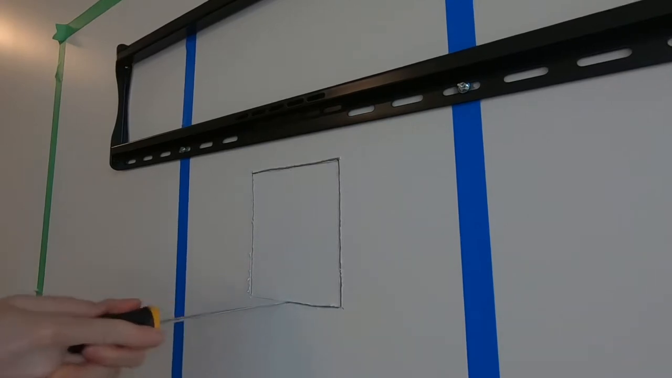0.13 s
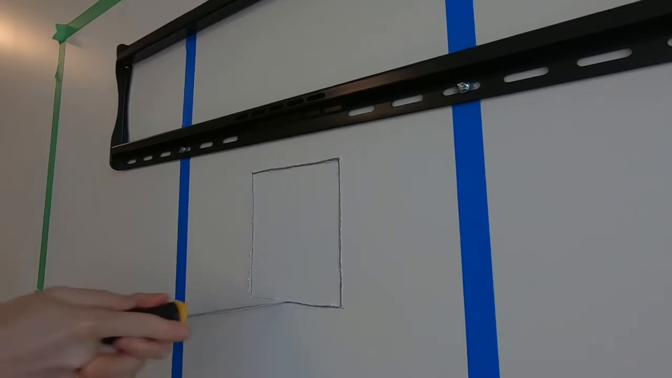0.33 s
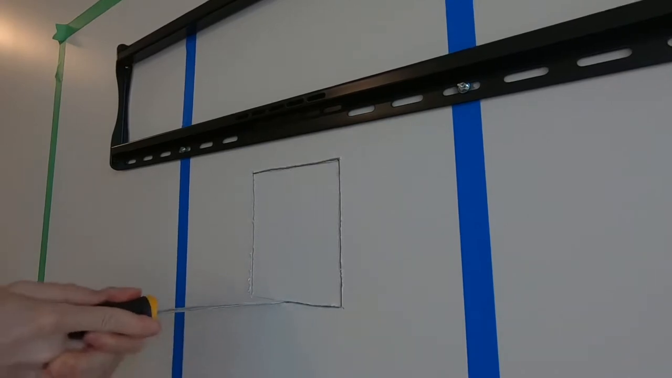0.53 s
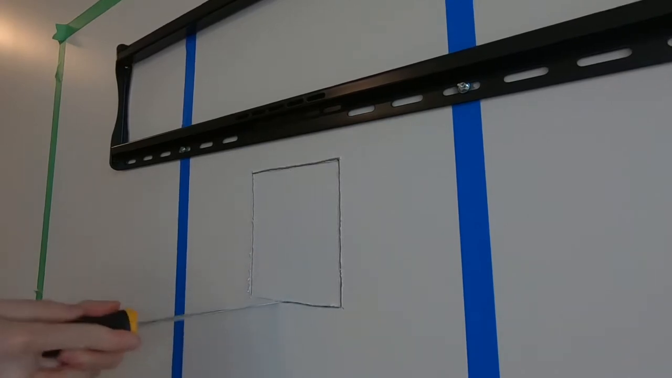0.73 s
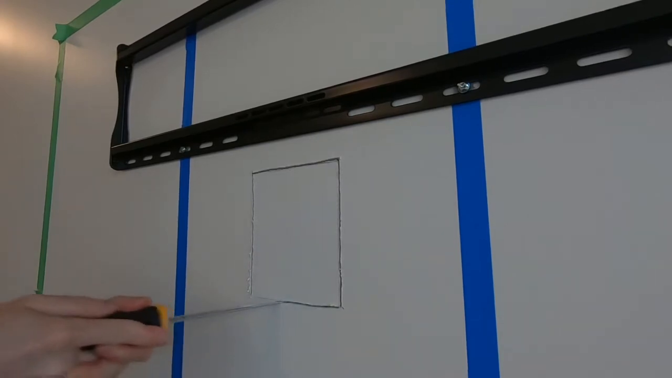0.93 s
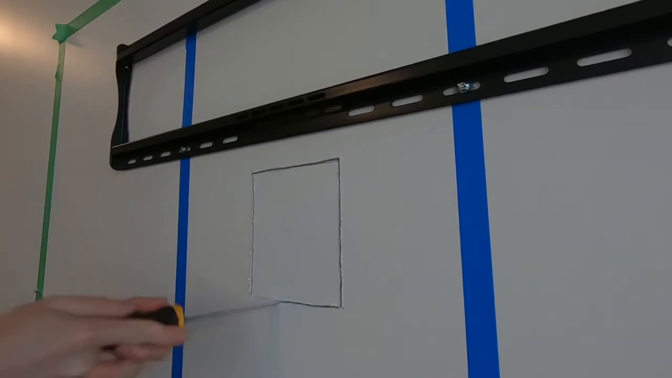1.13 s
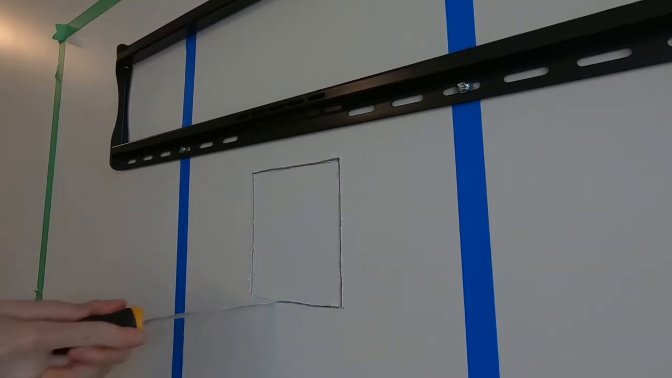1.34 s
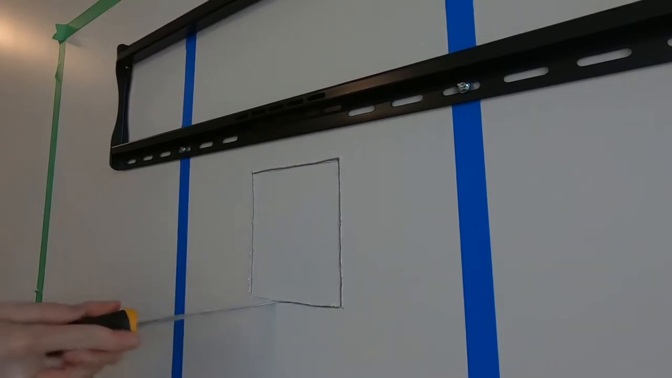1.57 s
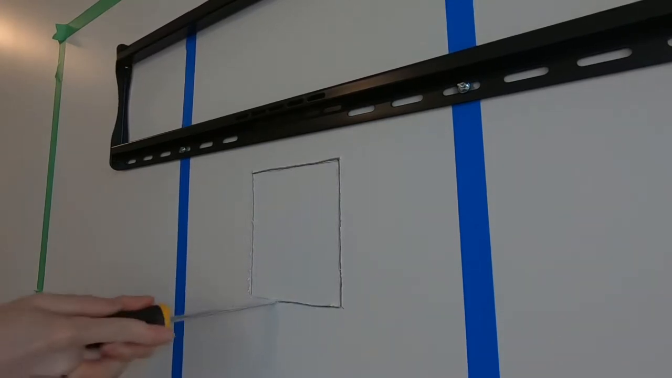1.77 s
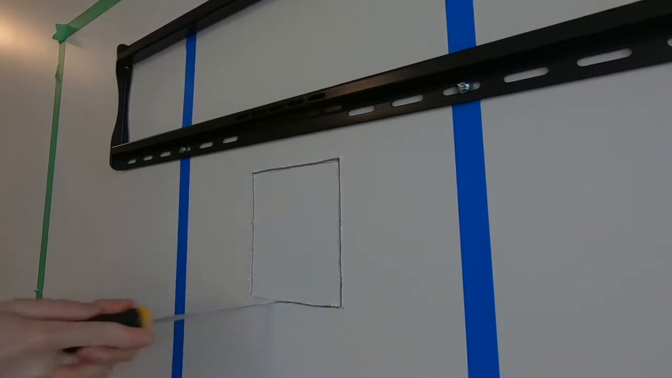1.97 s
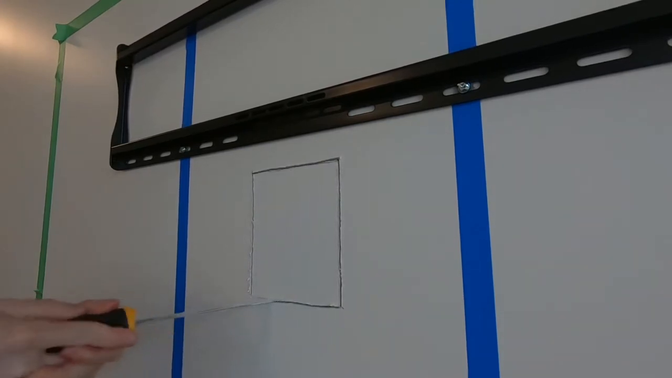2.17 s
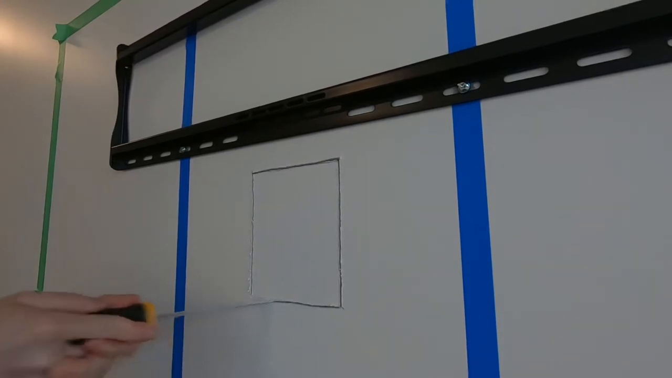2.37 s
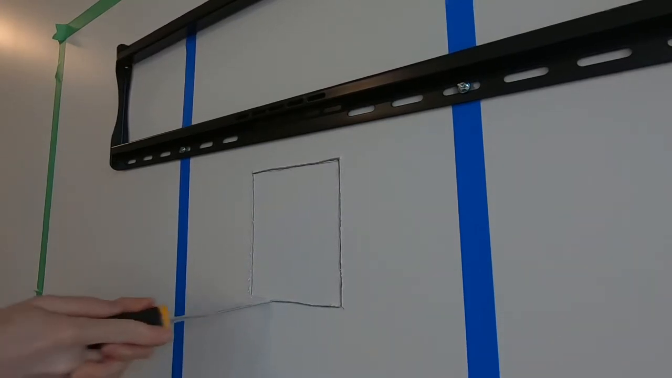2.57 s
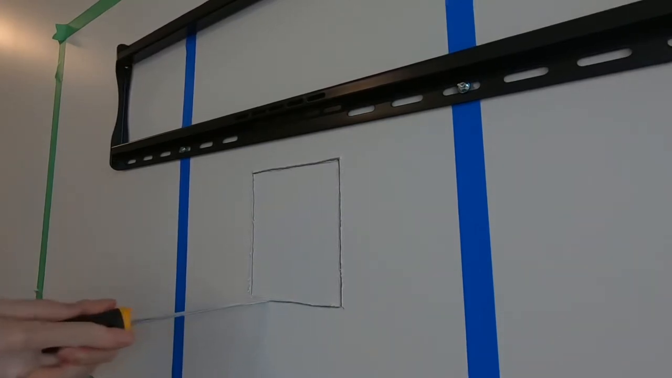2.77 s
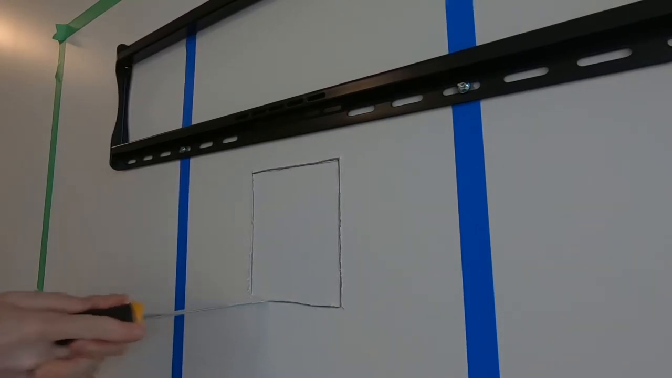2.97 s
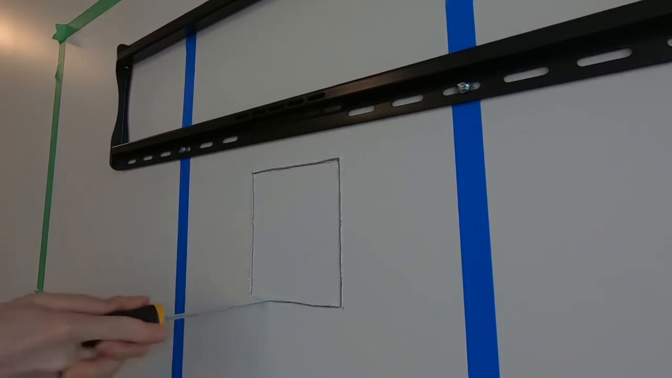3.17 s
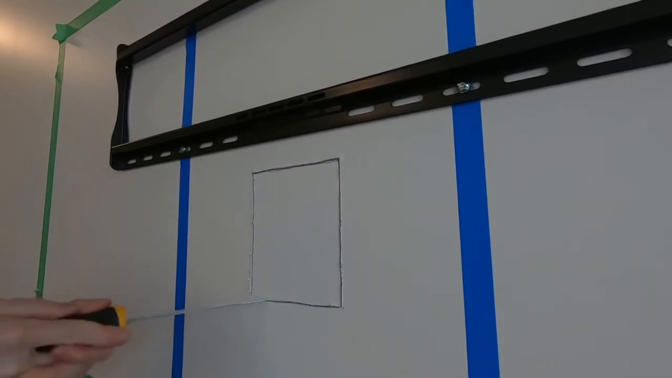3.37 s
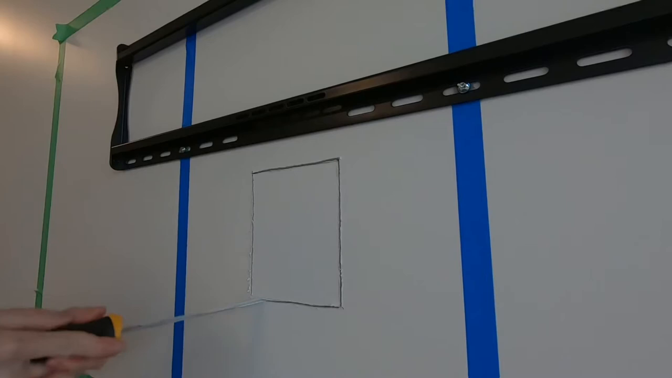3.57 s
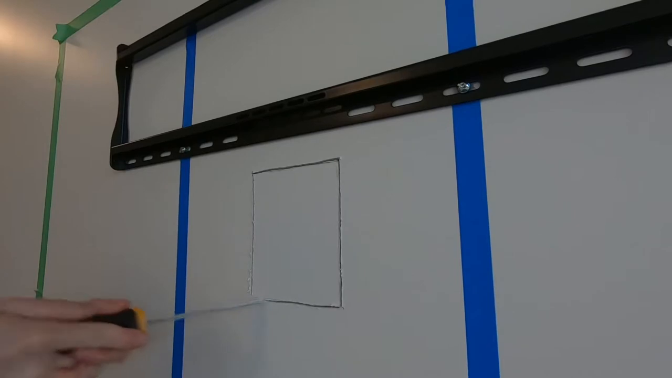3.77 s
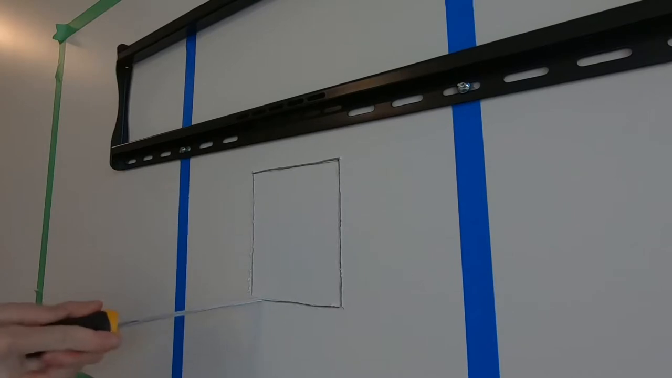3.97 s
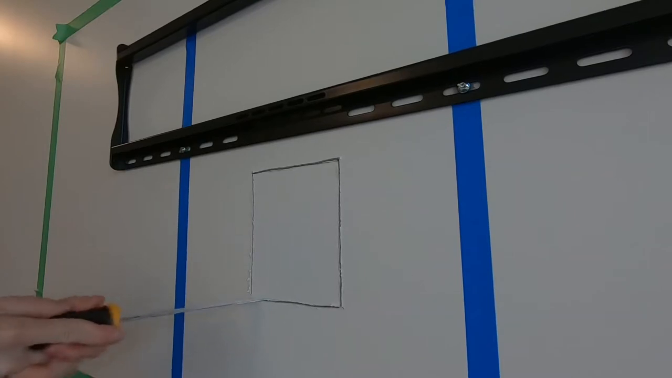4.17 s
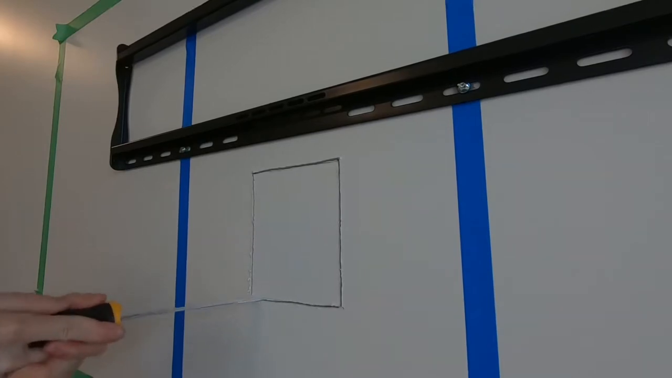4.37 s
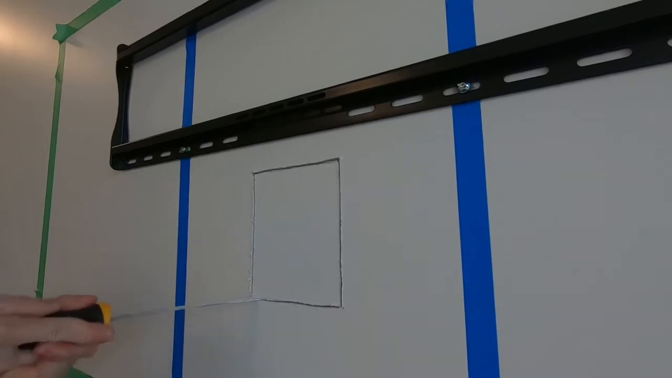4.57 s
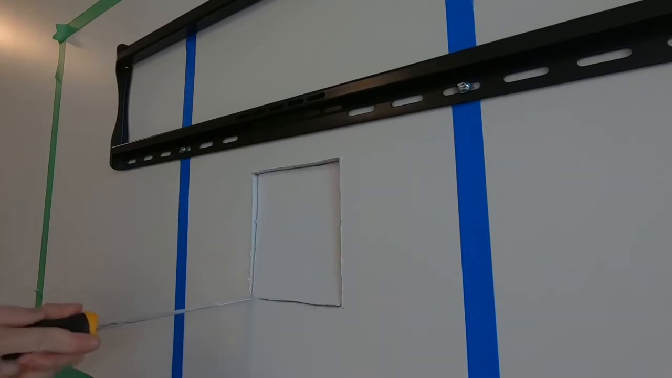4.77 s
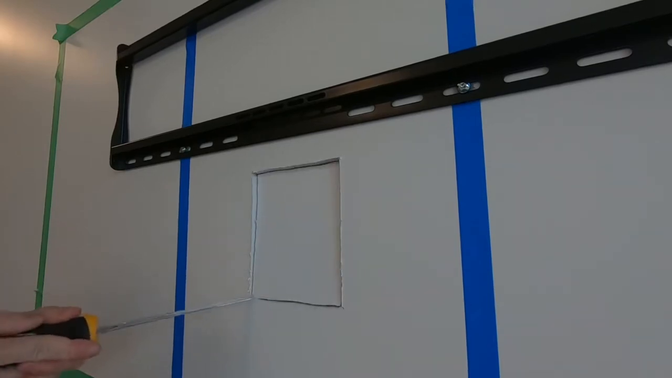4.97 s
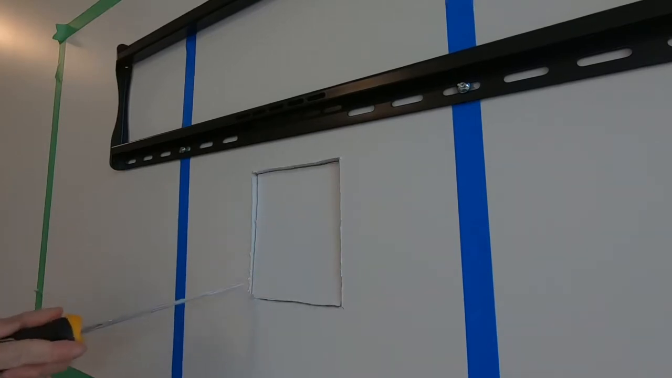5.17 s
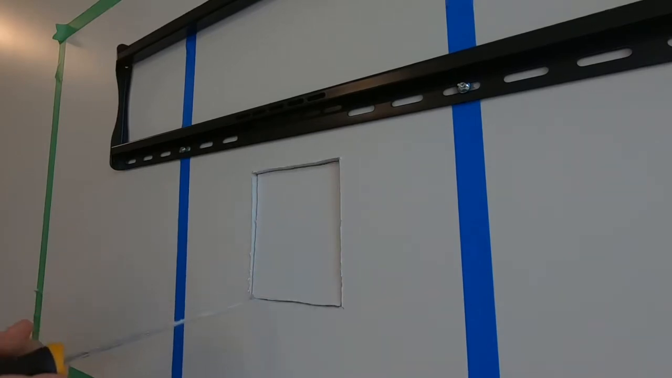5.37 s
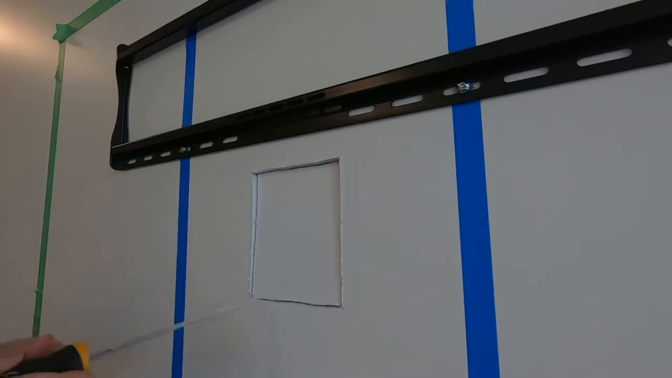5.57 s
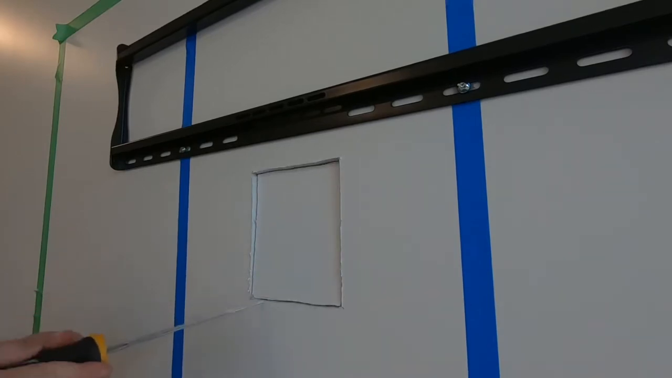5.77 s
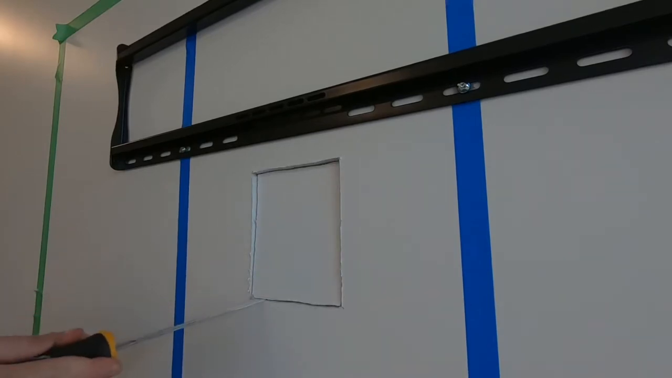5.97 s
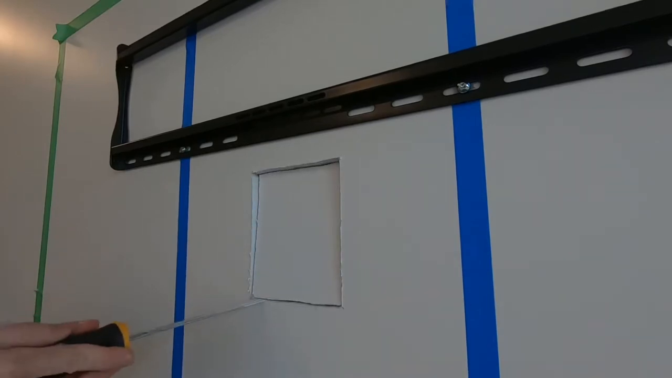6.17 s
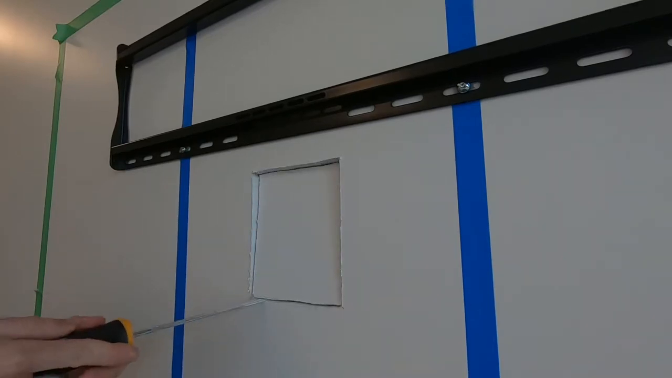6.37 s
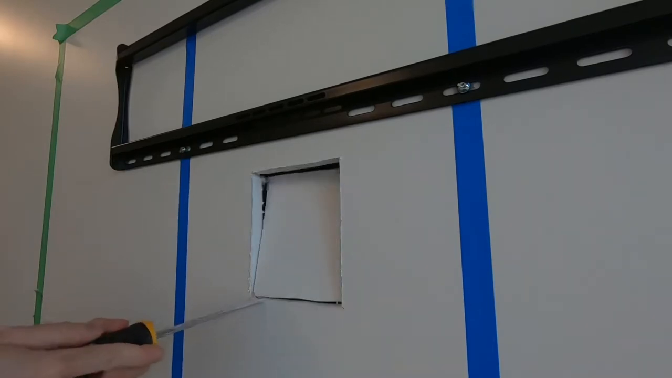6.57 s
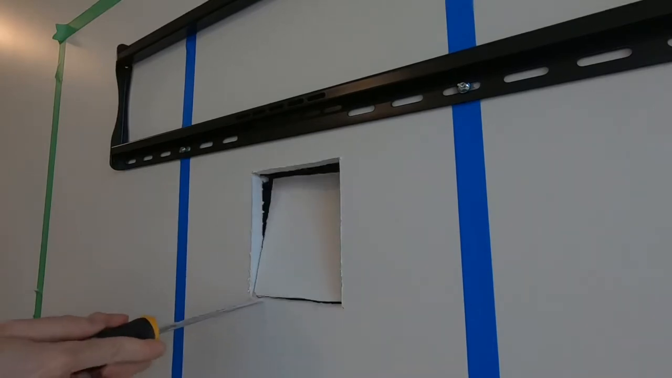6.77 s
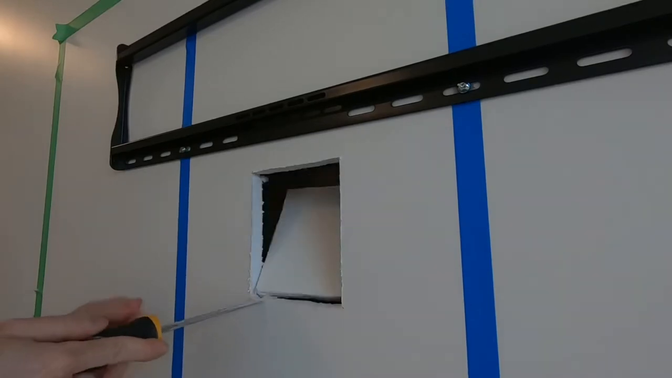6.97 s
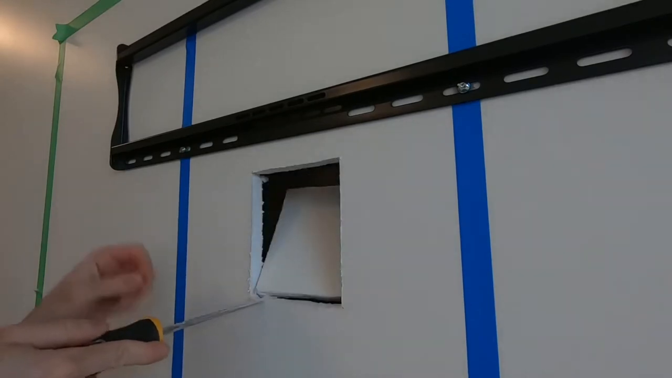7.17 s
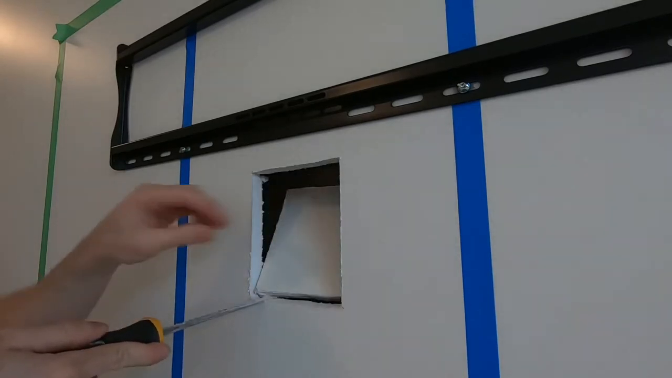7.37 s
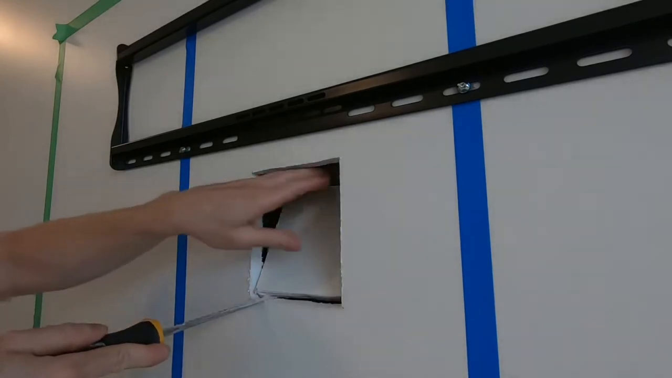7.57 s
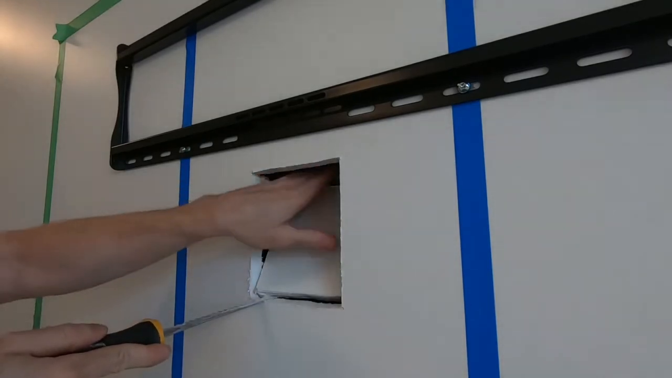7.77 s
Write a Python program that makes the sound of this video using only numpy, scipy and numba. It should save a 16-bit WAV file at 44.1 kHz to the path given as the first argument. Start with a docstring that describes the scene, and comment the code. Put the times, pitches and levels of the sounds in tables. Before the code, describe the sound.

From the start, a hand saw cuts through a plasterboard wall close by, in quick, slightly uneven back-and-forth strokes, about three or four pushes a second. Each stroke has a gritty crunch, a thin ring or squeak from the blade and a low, hollow thump from the wall. After about 4.2 seconds the strokes weaken, with small snaps, and die away by 5 seconds. A lull follows, with faint bumps and a faint low creak near 5.8 seconds. From 6 to 6.5 seconds the blade scrapes and rings briefly, loudest at the end, followed by crumbling ticks. At about 7 seconds the cut piece tips back with a quick double thud and rocks briefly. Around 7.5 seconds it gives a few light ticks under a hand. The bare room adds a short echo over faint air noise and a low hum.

```python
"""A hand saw jabs back and forth through a plasterboard wall, close by in a bare room.
Each tooth shakes the hollow wall; gypsum grit crunches and rings the blade. The cut piece then
slips, tips back with a thud and ticks under a hand. The room rings on for most of a second
over faint air noise and hum."""
import sys
import numpy as np
from scipy import signal
from scipy.fft import rfft, irfft
from scipy.io import wavfile
from scipy.ndimage import uniform_filter1d
from numba import njit

SR = 44100
rng = np.random.default_rng(int(sys.argv[2]) if len(sys.argv) > 2 else 0)


def output_pcm(signal):
    """Save a mono or channel-first signal as 16-bit PCM at the path in sys.argv[1].

    Samples are clipped to [-1, 1] before scaling.
    """
    pcm = np.clip(np.atleast_2d(signal).T, -1, 1) * 32767
    wavfile.write(sys.argv[1], SR, np.round(pcm).astype(np.int16))


N = 344421

# saw strokes (peak time [s], push 1 or pull -1, rise [s], grit [dB], wall [dB], nominal tooth rate [Hz],
# deep wall [dB re grit], board face [dB re grit], whistle [dB re grit]); levels are relative drives
STROKES = [(0.0, 1, 0.057, -35, -14.5, 130.1, 17.6, 5.2, -3),
           (0.071, -1, 0.067, -40, -22.5, 129.9, 6.2, 3.5, -10),
           (0.235, 1, 0.055, -34.5, -15, 153.2, 11.3, 2.5, -9),
           (0.337, -1, 0.067, -36.5, -15.5, 168.6, 9.6, 5, -4.5),
           (0.667, -1, 0.034, -38.5, -20.5, 169.4, 20, 4.44, 0),
           (0.788, 1, 0.036, -32.5, -16, 166.7, 10.7, 3.92, -6.5),
           (0.944, -1, 0.068, -38.0, -23.5, 157.2, 15.6, 2.6, -5),
           (1.083, 1, 0.051, -30, -13.5, 151.5, 5.84, 4.05, -8.5),
           (1.237, -1, 0.079, -36, -17.5, 151.8, 10.2, 4.6, -3),
           (1.535, -1, 0.024, -42.5, -26.5, 143.6, 17.3, 2.4, -2.5),
           (1.675, 1, 0.035, -32, -15.5, 174.5, 8.5, 3.65, -6.5),
           (1.84, -1, 0.07, -35, -19, 147.2, 11.2, 3.9, -1),
           (1.971, 1, 0.04, -29.5, -15, 166.3, 10.4, 4.1, -7.5),
           (2.12, -1, 0.078, -37.5, -18.5, 140.0, 17, 3.79, 2.5),
           (2.25, 1, 0.052, -32, -20.5, 156.9, 11.6, 3.28, -5.5),
           (2.379, -1, 0.079, -36, -20.0, 139.2, 13.7, 1.3, -2.5),
           (2.534, 1, 0.055, -29, -16, 144.8, 9.36, 1.62, -9),
           (2.663, -1, 0.075, -36.5, -18, 137.4, 9.4, 3.28, -1.5),
           (2.824, 1, 0.056, -30.5, -18.5, 148.4, 12, 4.28, -5.5),
           (2.974, -1, 0.074, -37.5, -19.5, 146.1, 12.1, 2.6, 0.5),
           (3.097, 1, 0.046, -33.5, -15, 141.0, 10.5, 5.22, -7),
           (3.258, -1, 0.075, -35.5, -19.5, 146.2, 6, 4.3, 0),
           (3.36, 1, 0.048, -45, -31.5, 140.3, 17.5, 4.5, -10.5),
           (3.582, -1, 0.054, -44.5, -28.5, 149.2, 13.9, 2.75, -2.5),
           (3.742, 1, 0.045, -32.5, -16.5, 159.6, 11.3, 3.6, -2.5),
           (3.851, -1, 0.061, -36, -18, 135.6, 13.8, 3.9, 1.5),
           (4.015, 1, 0.05, -30.5, -19.5, 141, 14.1, 3.5, -4.5),
           (4.151, -1, 0.078, -39.5, -29, 146.1, 14.7, 2.83, 1.5),
           (4.267, 1, 0.056, -52, -32, 151.4, 17, 2.28, -9),
           (4.451, -1, 0.04, -43.5, -26.5, 141.5, 15.5, 2.9, -5.5),
           (4.53, 1, 0.041, -53.5, -36.5, 139.3, 16.5, 2.9, -8.5),
           (4.614, 1, 0.04, -49, -39.5, 128.8, 16.4, 2.44, -4.5),
           (4.702, -1, 0.021, -45.5, -31.5, 175.8, 12.4, 2.8, -3.5),
           (4.93, -1, 0.012, -50.5, -51.5, 133.2, 6.3, 3.0, -5),
           (5.07, -1, 0.06, -61, -65.5, 133, 10.5, 1.3, -6),
           (5.272, -1, 0.058, -71.5, -67.5, 134.7, 12, 1.9, 7.5),
           (5.877, 1, 0.05, -74.5, -53, 198.3, 20, 3.66, 1.5),
           (5.926, -1, 0.071, -70.5, -75, 200.5, 13, 2.8, -1.5),
           (6.035, 1, 0.051, -61, -37.5, 182.6, 19, 2.4, -9),
           (6.146, -1, 0.067, -53.5, -36.5, 158.1, 8.3, 2.6, 2),
           (6.375, 1, 0.018, -43, -19.5, 158, 13.7, 3.2, -11.5),
           (6.43, 1, 0.044, -35, -21.5, 140.8, 13, 3.75, -7),
           (6.785, -1, 0.05, -54.5, -41.5, 178.2, 14.7, 2.8, -13),
           (6.893, 1, 0.064, -64.5, -55, 160, 15, 2.67, -7)]
# snaps and ticks (time [s], peak [dB], centre [Hz], crumble time [s])
SNAPS = [(1.505, -36, 3475, 0.028), (1.939, -26, 2942, .003), (4.436, -35, 3029, .01),
         (4.681, -41, 3092, .02), (4.688, -42, 5400, 0.016), (4.698, -29, 2900, 0.018),
         (4.916, -41.5, 2308, 0.012), (5.822, -58.5, 3144, 0.0063), (5.856, -60, 3290, .006),
         (6.029, -41, 2400, 0.014), (6.356, -35, 4010, 0.013), (6.751, -47, 5635, 0.0055),
         (6.77, -50, 7500, 0.016), (6.788, -50, 6100, .006), (6.82, -47, 6200, .008),
         (6.85, -46, 6990, .015), (6.892, -46, 6480, 0.0035), (6.929, -55, 4500, .004),
         (6.936, -43.5, 2660, .005), (6.935, -46, 8000, .003), (7.515, -53, 5240, .004),
         (7.5198, -40.5, 5200, .006), (7.527, -48, 2480, .004), (7.5331, -38.5, 6050, 0.01),
         (7.539, -47, 2500, .009), (7.561, -47, 7300, .006), (7.585, -56, 6500, .02),
         (7.62, -56.5, 6000, 0.018), (7.655, -62, 6050, .02)]
# spells of blade song (centre time [s], pitch [Hz], level [dB], half length [s])
SQUEAKS = [(0.194, 5680, -55, 0.02), (0.221, 5750, -46, 0.026), (0.235, 1900, -43, 0.015),
           (0.244, 2920, -47, 0.015), (0.36, 3800, -45, 0.03), (0.537, 1890, -53, 0.011),
           (0.627, 5740, -65, 0.027), (0.668, 3300, -46, 0.02), (0.675, 4900, -51, 0.015),
           (0.795, 5680, -48, 0.022), (0.819, 1920, -42, 0.023), (0.871, 8000, -64, 0.027),
           (0.964, 5690, -54, 0.02), (1.036, 5760, -56, 0.022), (1.062, 3780, -42, 0.027),
           (1.077, 5750, -48, 0.026), (1.193, 5700, -50, 0.016), (1.202, 3870, -43, 0.033),
           (1.245, 3200, -46, 0.013), (1.527, 5690, -61, 0.022), (1.535, 4830, -55, 0.019),
           (1.54, 3400, -50, 0.015), (1.643, 5690, -58, 0.022), (1.672, 5760, -47, 0.022),
           (1.68, 1950, -42, 0.02), (1.791, 3770, -48, 0.019), (1.82, 3550, -44, 0.02),
           (1.84, 8770, -58, 0.023), (1.843, 3300, -40, 0.017), (1.94, 3600, -41, 0.006),
           (1.959, 5740, -50, 0.02), (1.975, 3700, -42, 0.012), (2.05, 1800, -42, 0.035),
           (2.124, 3000, -40, 0.015), (2.128, 8860, -57, 0.02), (2.232, 5750, -47, 0.023),
           (2.25, 1900, -42, 0.02), (2.345, 3870, -46, 0.019), (2.374, 8790, -55, 0.017),
           (2.421, 8870, -63, 0.029), (2.667, 8800, -57, 0.036), (2.821, 5700, -48, 0.017),
           (2.891, 4030, -47, 0.038), (2.949, 8780, -56, 0.013), (3.117, 3940, -43, 0.02),
           (3.123, 5670, -49, 0.019), (3.207, 8690, -61, 0.024), (3.23, 6630, -58, 0.026),
           (3.233, 5690, -50, 0.026), (3.239, 8850, -57, 0.023), (3.27, 4550, -52, 0.012),
           (3.573, 5680, -61, 0.024), (3.579, 8700, -64, 0.013), (3.834, 5700, -51, 0.035),
           (3.837, 8690, -56, 0.019), (3.85, 3200, -44, 0.015), (3.85, 4900, -52, 0.015),
           (4.081, 5230, -57, 0.038), (4.139, 8690, -59, 0.023), (4.319, 8700, -66, 0.01),
           (4.441, 5670, -57, 0.023), (4.45, 3150, -48, 0.01), (4.609, 8710, -68, 0.026),
           (4.612, 5600, -60, 0.02), (4.7, 3090, -50, 0.012), (4.702, 2300, -52, 0.008),
           (4.728, 5860, -62, 0.032), (6.008, 5600, -66, 0.009), (6.043, 1560, -59, 0.013),
           (6.139, 5600, -60, 0.022), (6.147, 4700, -56, 0.02), (6.22, 4700, -65, 0.011),
           (6.368, 2660, -58, 0.019), (6.4, 1500, -45, 0.03), (6.4, 4700, -40, 0.022),
           (6.42, 1950, -42, 0.03), (6.426, 5600, -46, 0.02), (6.487, 4700, -49, 0.011),
           (6.571, 4700, -54, 0.035), (6.66, 4700, -61, 0.05), (6.803, 3890, -64, 0.022),
           (6.812, 6130, -67, 0.036), (6.896, 3890, -64, 0.027), (6.934, 6990, -62, 0.009),
           (6.937, 4700, -66, 0.014), (6.946, 2320, -57, 0.011)]
# bumps on the board (time [s], peak [dB], contact time [s])
KNOCKS = [(.2, -16, 0.0026), (.33, -18.5, .0025), (.645, -24, 0.0028), (.77, -21.5, 0.0026),
          (1.05, -16.5, 0.0024), (1.516, -27, .003), (1.664, -15.5, .0025), (1.958, -17.5, 0.0019),
          (2.225, -22.5, 0.0026), (2.496, -17, .0025), (2.628, -13.5, 0.0029), (2.83, -18, 0.0022),
          (3.091, -23.5, .0025), (3.715, -20, .0025), (4.0, -20, .0025), (5.2, -44.5, 0.012),
          (5.28, -48, .012), (6.03, -37.5, .0036), (6.937, -21, .0039), (6.968, -33, 0.0061),
          (6.985, -22.5, .0044)]
# resonances (frequency [Hz], width [Hz], gain [dB])
WALL_MODES = [(94.3, 22, -5.5), (116.1, 19.7, -1), (130.8, 13.9, 3.5), (159.8, 22.4, -5), (191.5, 36, -11),
              (265.5, 50.2, -8.5)]
DEEP_WALL_MODES = [(30.3, 12, -6), (50.7, 13.8, 3.5), (72.5, 10.3, 1)]
FACE_MODES = [(287, 46, -4.5), (369.6, 31.3, -7), (447.7, 42.4, -6), (527, 39, -9.5), (678, 63, -13)]  # board near the cut
BLADE_MODES = [(1270, 60, 7), (1500, 41, 5.5), (1790, 110, 8), (1915, 80, 12), (2495, 40, 7), (2740, 50, 8),
               (2940, 130, 5)]  # blade in the cut
BRIGHT_BLADE_MODES = [(4840, 200, 3), (5700, 90, 10), (6520, 150, -3), (7050, 90, -2), (8760, 120, 1)]
FREE_BLADE_MODES = [(1510, 34, 2), (1767, 58, 1), (1918.6, 45.8, 0), (2253, 31.7, 5), (2600, 36, -8.5),
                    (3094, 38, 2.5), (3897, 73.7, 3), (4697, 25, 4), (5600, 45, -4)]  # blade out of the cut
RASP_BANDS = [(1404, 970, 1.5), (2380, 930, -7.5), (3080, 600, -4), (3980, 420, -4.5)]  # broad peaks of the crunch
BRIGHT_RASP_BANDS = [(4900, 680, 0.0073), (6610, 790, 0), (7200, 580, 0.0095), (9200, 1500, 0.003)]
# filter curves (frequency [Hz], gain [dB])
GRIT_CURVE = [(290, -30), (500, 0), (823, -7), (1300, -7), (1860, -8), (2800, -7), (4000, -23.5),
              (4300, -19), (5590, -23.5), (6040, -26), (8840, -27.5), (10300, -31), (11000, -39),
              (14500, -45.5), (22000, -110)]
AIR_CURVE = [(18, -35.5), (30, 7), (63, 0.5), (81, -21.5), (118, -9), (140, -9.5), (275, -16), (566, -32),
             (762, -21.5), (11500, -51.5), (14900, -78.5), (22000, -120)]
SIDE_CURVE = [(40, -19), (125, -61.5), (250, -34.5), (500, -8), (1000, -0.5), (2000, -2), (4000, -7.5),
              (8000, 4.5), (14000, 4)]  # stereo side of the reverb
# room hum (frequency [Hz], rms level [dB])
HUM_TONES = [(53.8, -82), (107.7, -73.5)]

LOOSE_S, OPEN_S = 4.9, 5.72  # piece cut free, hole opens
BLADE_OUT_S, BLADE_STILL_S = 5.6, 7.3
FALL_S, WALL_LAG_S, DEEP_LAG_S = .037, .008, .027
BOARD_TOP_HZ, CRUNCH_SPLIT_HZ = 820, 4300
SLOT_HZ, SLOT_GLIDE_HZ, SLOT_WIDTH_HZ = 3583, 333, 600
GRIP_DB_PER_S = -1  # less blade ring as the cut nears its end
ROCK_GAP_S, ROCK_STEP_DB = .04, -5
CAVITY_T60_S, ROOM_T60_S, ROOM_DAMPING = .56, 1, .063


def saw():
    """Teeth catch unevenly; gypsum grains break most at each bite. Returns crunch, wall, cavity."""
    grit, bright, wall, deep, face, whistle, tooth_hz, slot_hz = stroke_envelopes()
    waver = uniform_filter1d(rng.standard_normal(N), 400)
    teeth_passed = np.cumsum(tooth_hz * np.clip(1 + .2 * waver / waver.std(), .2, 2)) / SR
    catches = np.diff(np.floor(teeth_passed), prepend=0) * undb(3.7 * rng.standard_normal(N))
    force = level(catches, 0) + level(rng.standard_normal(N), -1.2)
    grains = rng.standard_normal(N) * undb(2.3 * np.minimum(rng.exponential(size=N), 6.5))
    grains = level(grains * (.5 + np.exp(-(teeth_passed % 1) / 1.5)), 0)
    crunch = gypsum_crunch(grains, grit, bright)
    crunch += level(slot_whistle(grains * whistle, slot_hz), -12.5) * np.std(crunch)
    crunch *= undb(-6.5) / np.std(colour(grains[:2 * SR], GRIT_CURVE))
    return crunch, wall_shake(force, wall, deep, face), cavity(grit, wall)


def stroke_envelopes():
    """Each stroke swells and fades. Returns six drive amplitudes, tooth rate and whistle pitch."""
    t = np.arange(0, N + 64, 64) / SR
    power, tooth_hz, slide = np.full((6, len(t)), 1e-14), np.zeros(len(t)), np.zeros(len(t))
    for peak_s, way, rise_s, grit_db, wall_db, rate_hz, deep_db, face_db, whistle_db in STROKES:
        from_peak = (t - peak_s) / np.where(t < peak_s, rise_s, FALL_S)
        bite = undb(-10 * from_peak ** 2) ** 2
        lagged = np.interp(t - WALL_LAG_S, t, from_peak)
        shove = undb(np.where(lagged < 0, -8., -1.5) * lagged ** 2) ** 2  # wall outlasts the crunch
        deep_shove = np.interp(t - DEEP_LAG_S, t, shove ** np.where(lagged < 0, 1, .36))  # slower decay
        # light strokes are brighter, the first few duller
        bright_db = 1 - .46 * max(grit_db + 35, -20) - 9.5 * np.exp(-peak_s / .71)
        whistle = bite ** 2 * undb(grit_db + whistle_db) ** 2
        power += [bite * undb(grit_db) ** 2,
                  bite * undb(grit_db + bright_db) ** 2,
                  shove * undb(wall_db) ** 2,
                  deep_shove * undb(grit_db + deep_db) ** 2,
                  bite * undb(grit_db + face_db) ** 2,
                  whistle]
        slide += whistle * way * np.clip(from_peak + .5, -1, 1)  # climbs on a push, sinks on a pull
        tooth_hz = np.maximum(tooth_hz, rate_hz * (.7 + .35 * shove) * (shove > 1e-3))
    slot_hz = SLOT_HZ + SLOT_GLIDE_HZ * slide / power[-1]
    return [np.interp(np.arange(N) / SR, t, curve) for curve in (*np.sqrt(power), tooth_hz, slot_hz)]


def gypsum_crunch(grains, grit, bright):
    """Grit crunches in a low and a high band and rings the blade while the cut grips it."""
    out, loose = 0, int(LOOSE_S * SR)
    blade_drive = (grains * grit)[:loose] * undb(GRIP_DB_PER_S * np.arange(loose) / SR)
    bands = ((grit, "low", BLADE_MODES, -6, RASP_BANDS),
             (bright, "high", BRIGHT_BLADE_MODES, -7, BRIGHT_RASP_BANDS))
    for envelope, kind, modes, blade_db, rasp in bands:
        crunch = split(colour(grains * envelope, GRIT_CURVE), CRUNCH_SPLIT_HZ, kind)
        crunch += undb(-7) * shifting_ring(crunch, rasp, spread_db=6)
        # modes come and go as the blade's free length changes
        steel = dull(np.r_[shifting_ring(blade_drive, modes, spread_db=4), np.zeros(N - loose)])
        out = crunch - out + level(steel, blade_db) * np.std(crunch)  # opposite signs: no crossover gap
    return out


def slot_whistle(grains, slot_hz):
    """The gap of the cut whistles as the blade slides: two gliding band-passes."""
    return sweep(sweep(grains, slot_hz, SLOT_WIDTH_HZ), slot_hz, 2 * SLOT_WIDTH_HZ)


def wall_shake(force, wall, deep, face):
    """Tooth force drives three sets of modes; the board does not follow quick pushes."""
    push = split(force, BOARD_TOP_HZ, "low")
    body = sum(ring(push * envelope, modes) / np.std(ring(push[:int(LOOSE_S * SR)], modes))
               for envelope, modes in ((wall, WALL_MODES), (deep, DEEP_WALL_MODES), (face, FACE_MODES)))
    return undb(-2.5) * split(body, BOARD_TOP_HZ, "low")


def knocks():
    """The catching blade jolts the board; later the loose piece bumps, then rocks five times."""
    out = np.zeros(N)
    last_s, last_db, last_contact_s = KNOCKS[-1]
    gaps_s = ROCK_GAP_S * (1 + .266 * rng.uniform(-1.08, 1, size=5))
    rebounds = [(last_s + delay_s, last_db + ROCK_STEP_DB * (k + 1), last_contact_s)
                for k, delay_s in enumerate(np.cumsum(gaps_s))]
    for time_s, peak_db, contact_s in KNOCKS + rebounds:
        push = np.r_[np.hanning(int(contact_s * SR) + 3), np.zeros(6000)]
        thud = ring(push, WALL_MODES + FACE_MODES[1:]) + undb(-3.5) * ring(push, DEEP_WALL_MODES)
        i = int(time_s * SR)
        out[i:i + len(thud)] += undb(peak_db) * thud / np.abs(thud).max()
    return out


def blade_squeaks():
    """Short spells in which one noise-driven blade mode sings unevenly."""
    out, reach = np.zeros(N), 6000
    t = np.arange(-reach, reach) / SR
    for time_s, hz, db, half_s in SQUEAKS:
        mode = [(hz, .035 * hz, 0)]
        tone = ring(ring(rng.standard_normal(len(t)), mode), mode)
        i = int(time_s * SR)
        out[i - reach:i + reach] += level(tone, db) * undb(-6 * (t / half_s) ** 2)
    return dull(out)


def snaps():
    """Snaps and ticks: band-passed noise with a sharp start and a crumbling tail."""
    out = np.zeros(N)
    t = np.arange(2000) / SR
    for time_s, peak_db, hz, crumble_s in SNAPS:
        band = signal.iirpeak(hz, Q=1.3, fs=SR)
        burst = rng.standard_normal(len(t)) * (np.exp(-t / .00085) + .5 * np.exp(-t / crumble_s))
        burst = signal.lfilter(*band, signal.lfilter(*band, burst))
        i = int(time_s * SR)
        out[i:i + len(t)] += undb(peak_db) * burst / np.abs(burst).max()
    return split(out, 9000, "low")


def free_blade(touches):
    """Out of the cut, the blade rings at every touch; the crumbling loses its top treble."""
    steel = dull(shifting_ring(touches, FREE_BLADE_MODES, spread_db=2))
    return split(touches, 11500, "low", order=5) + undb(4) * steel


def cavity(grit, wall):
    """With the piece loose, the space behind the wall answers in two bands; the open hole hums."""
    t = np.arange(N) / SR
    decay = undb(-60 / (CAVITY_T60_S * SR)) ** 2

    def linger(envelope):
        return np.sqrt(signal.lfilter([1 - decay], [1, -decay], envelope ** 2 * (t > LOOSE_S)))

    low, high = (ring(rng.standard_normal(N), [mode]) for mode in ((262, 19, 0), (700, 3100, 0)))
    hum = undb(-63) * np.clip((t - OPEN_S) / .14, 0, 1)
    return level(low, 0) * (undb(-17) * linger(wall) + hum) + level(dull(high), -4.5) * linger(grit)


def creak(start_s=5.8, length_s=.1676, from_hz=180, to_hz=231.2):
    """A faint low creak slides upward in pitch."""
    progress = np.clip((np.arange(N) / SR - start_s) / length_s, 0, 1)
    hz = from_hz + (to_hz - from_hz) * progress
    envelope = np.abs(np.sin(np.pi * progress)) ** .5 * (progress < 1)
    return undb(-48) * envelope * np.sin(2 * np.pi * np.cumsum(hz) / SR)


def room_reverb(send, body):
    """Stereo echo of the bare room, plus a little bass reflected from one side."""
    lags = np.array([701, 887, 1093, 1319, 1567, 1831, 2113, 2417])
    left, right = delay_network(send, lags, undb(-60 * lags / SR / ROOM_T60_S), ROOM_DAMPING)
    side = colour((left - right) / 2, SIDE_CURVE) + undb(-39) * np.roll(body, int(.004 * SR))
    return (left + right) / 2 + side * np.array([[1], [-1]])


@njit
def delay_network(x, lags, gain, damping):
    """Eight delay lines feed each other, duller on every round."""
    lines, damped, out = np.zeros((8, 4096)), np.zeros(8), np.zeros((2, len(x)))
    for i in range(len(x)):
        total = 0.
        for k in range(8):
            damped[k] += (1 - damping) * (gain[k] * lines[k, (i - lags[k]) & 4095] - damped[k])
            total += damped[k]
            out[k % 2, i] += damped[k] * (1 - (k & 2))
        for k in range(8):
            lines[k, i & 4095] = x[i] + 1e-18 + damped[k] - total / 4
    return out


def room_tone():
    """Faint air noise, wide above the bass, and a low hum."""
    mid, side = (colour(rng.standard_normal(N), AIR_CURVE) for _ in range(2))
    side = undb(6.5) * split(side, 250, "high")
    air = level(mid + side * np.array([[1], [-1]]), -64)
    t = np.arange(N) / SR
    return air + sum(np.sqrt(2) * undb(db) * np.sin(2 * np.pi * hz * t) for hz, db in HUM_TONES)


def undb(db):
    """Decibels to gain."""
    return 10 ** (np.asarray(db) / 20)


def level(x, db):
    """Scale to an rms level."""
    return x * undb(db) / np.sqrt(np.mean(x ** 2))


def colour(x, curve):
    """Minimum-phase filter through (frequency [Hz], gain [dB]) points."""
    hz, db = np.transpose(curve)
    grid_hz = np.arange(1025) * SR / 2048 + 1
    cepstrum = irfft(np.log(undb(np.interp(np.log(grid_hz), np.log(hz), db))))
    cepstrum[1:1024] *= 2
    cepstrum[1025:] = 0
    return signal.fftconvolve(x, irfft(np.exp(rfft(cepstrum))))[:N]


def ring(x, modes):
    """Resonator bank of alternating sign."""
    return sum((-1) ** k * undb(db) * signal.lfilter(*signal.iirpeak(hz, hz / width_hz, SR), x)
               for k, (hz, width_hz, db) in enumerate(modes))


def shifting_ring(x, modes, spread_db):
    """Resonators whose drive levels wander independently."""
    knots = np.arange(0, len(x) + 4000, 4000)
    wander_db = spread_db * rng.standard_normal((len(modes), len(knots)))
    return sum(ring(x * undb(np.interp(np.arange(len(x)), knots, db)), [mode])
               for mode, db in zip(modes, wander_db))


def split(x, hz, kind, order=2):
    """Butterworth low- or high-pass."""
    return signal.sosfilt(signal.butter(order, hz, kind, fs=SR, output="sos"), x)


def dull(x):
    """Steep treble loss for ringing parts."""
    return split(x, 9040, "low", order=6)


@njit
def sweep(x, hz, width_hz):
    """State-variable band-pass with a moving centre."""
    out, band_state, low_state = np.empty(len(x)), 0., 0.
    for i in range(len(x)):
        g, damping = np.tan(np.pi * hz[i] / SR), width_hz / hz[i]
        band = (band_state + g * (x[i] - low_state)) / (1 + g * (g + damping))
        band_state = 2 * band - band_state
        low_state += 2 * g * band
        out[i] = damping * band
    return out


def scene():
    """Saw, snaps and knocks in the centre, the room around them."""
    crunch, body, hollow = saw()
    song = blade_squeaks()
    crunch += snaps()
    body += knocks() + creak()
    out_of_cut = slice(int(BLADE_OUT_S * SR), int(BLADE_STILL_S * SR))
    crunch[out_of_cut] = free_blade(crunch[out_of_cut])
    send = undb(-6.5) * crunch + undb(-12) * song + undb(-11.5) * split(body, 140, "high")
    return crunch + song + body + hollow + room_reverb(send, body) + room_tone()


def record(dry, top_hz=14900):
    """Steep low-pass on the mix."""
    return signal.sosfilt(signal.ellip(8, .2, 70, top_hz, fs=SR, output="sos"), dry)


dry = scene()
out = record(dry)
output_pcm(out)
```